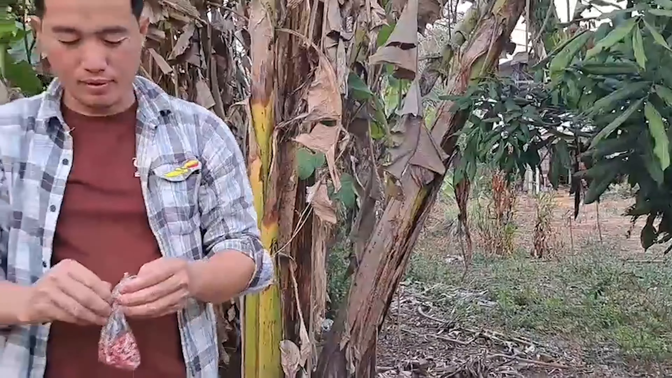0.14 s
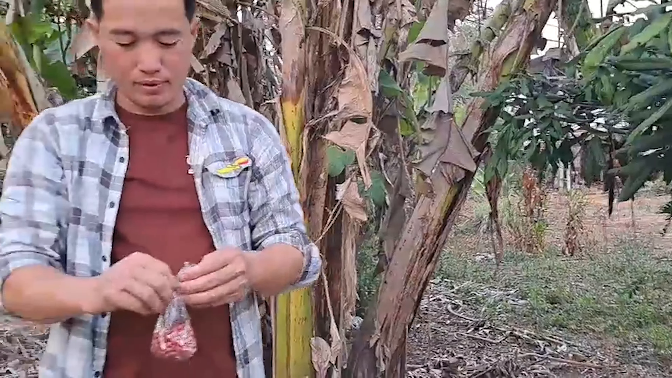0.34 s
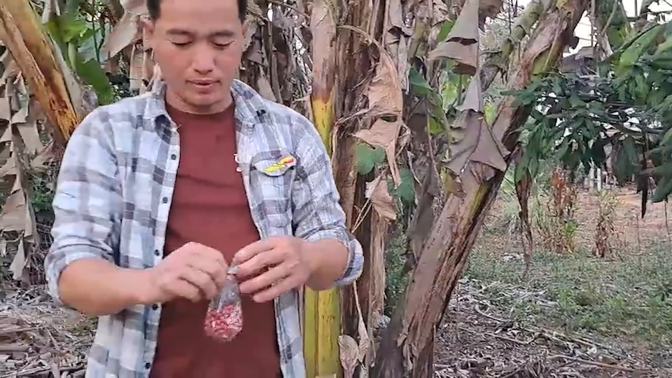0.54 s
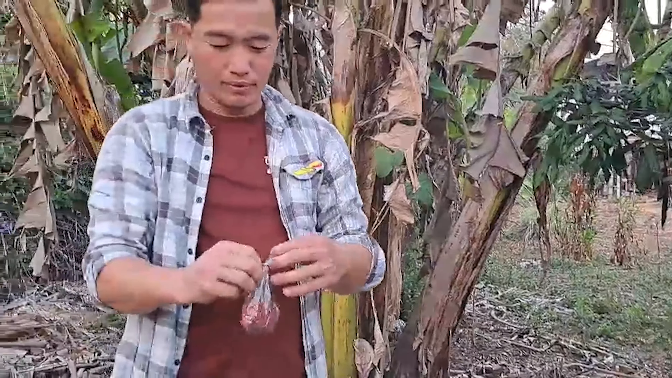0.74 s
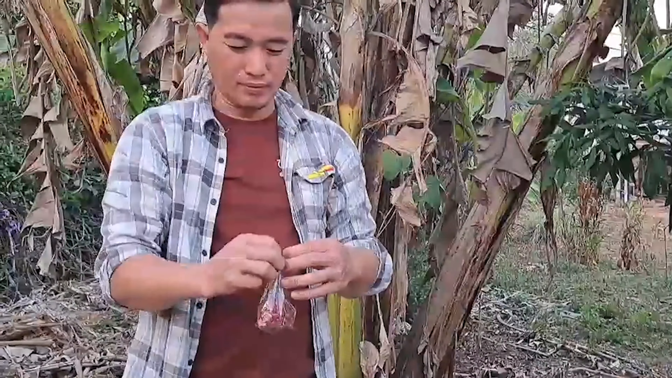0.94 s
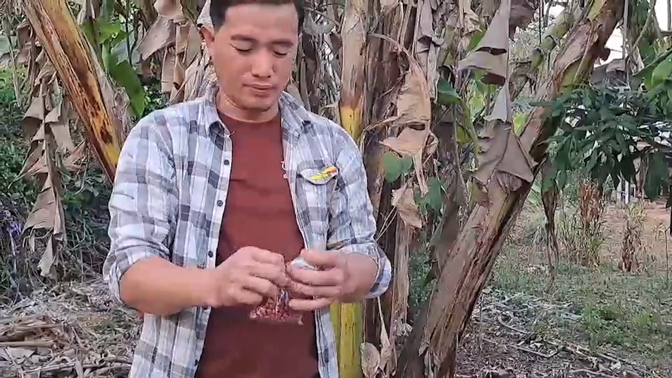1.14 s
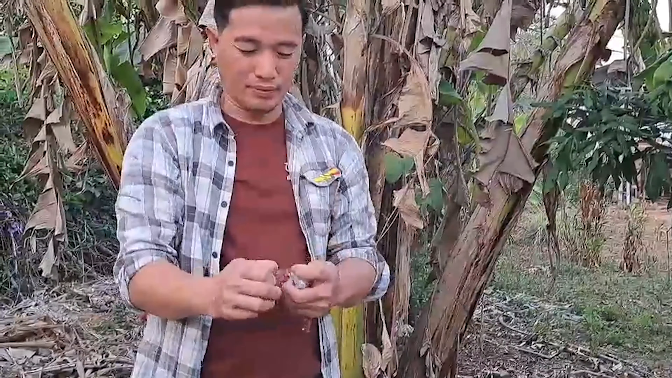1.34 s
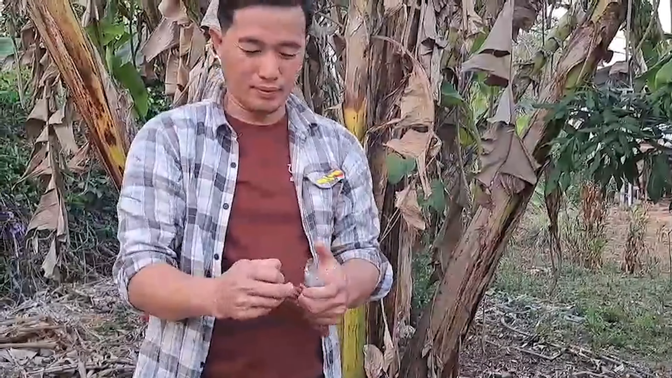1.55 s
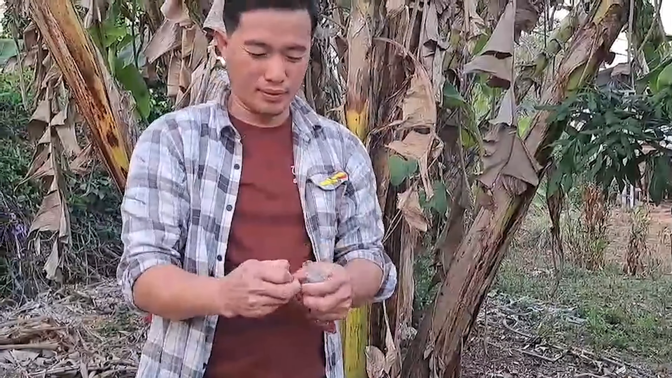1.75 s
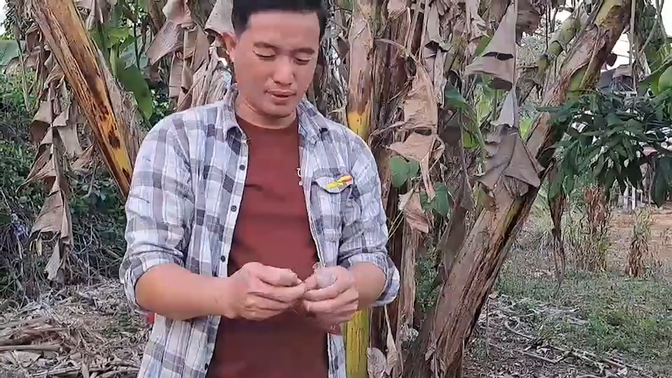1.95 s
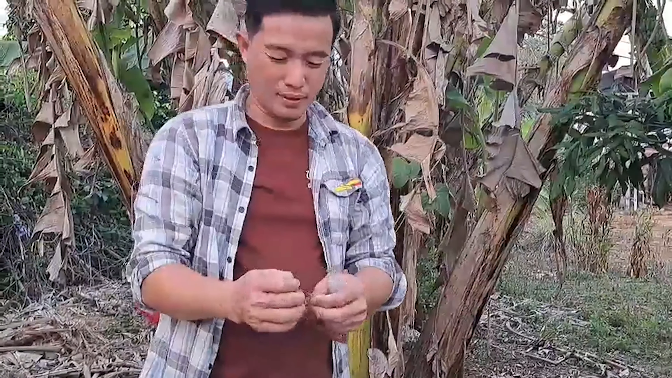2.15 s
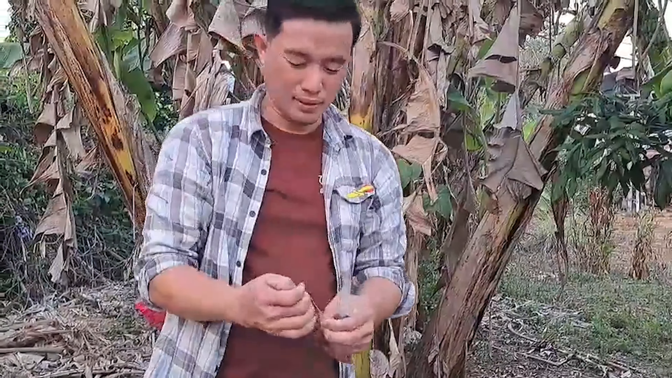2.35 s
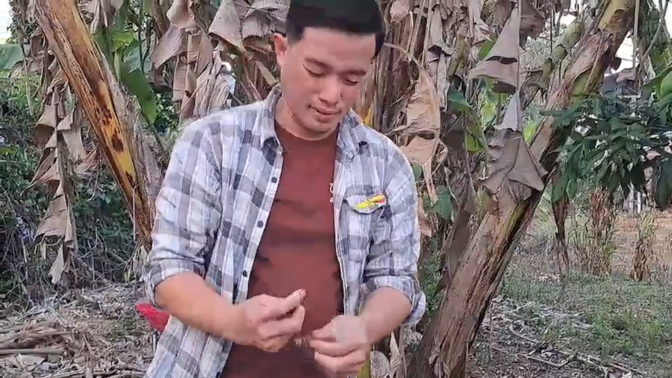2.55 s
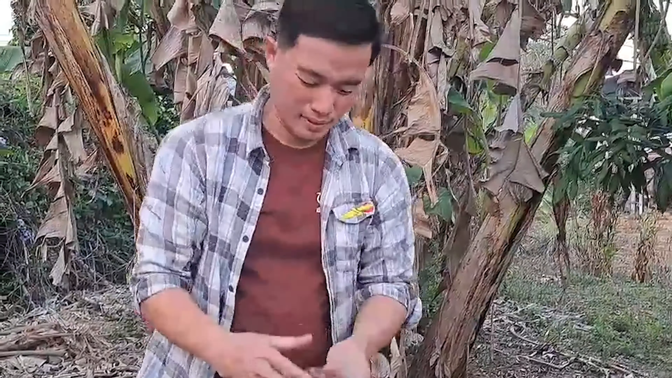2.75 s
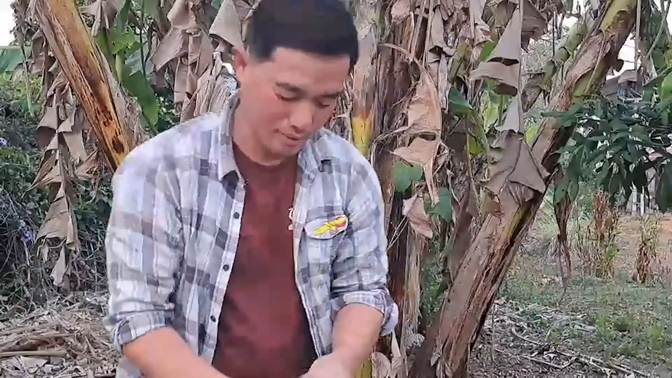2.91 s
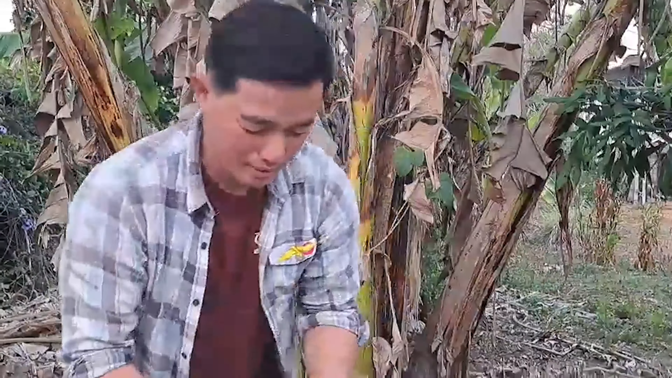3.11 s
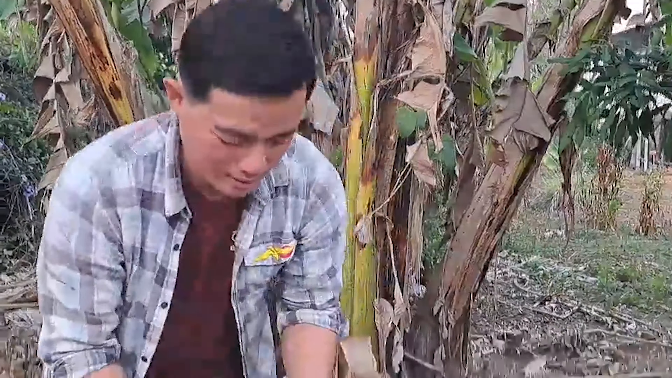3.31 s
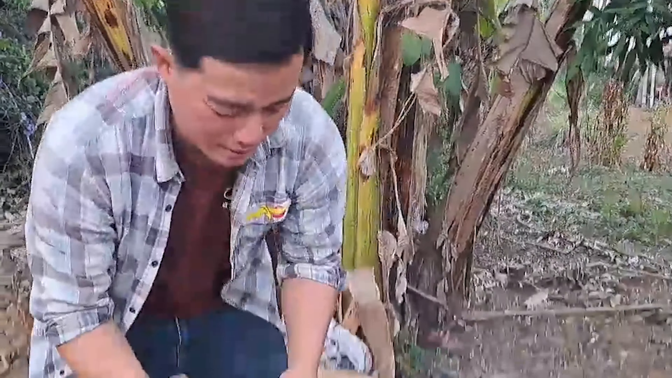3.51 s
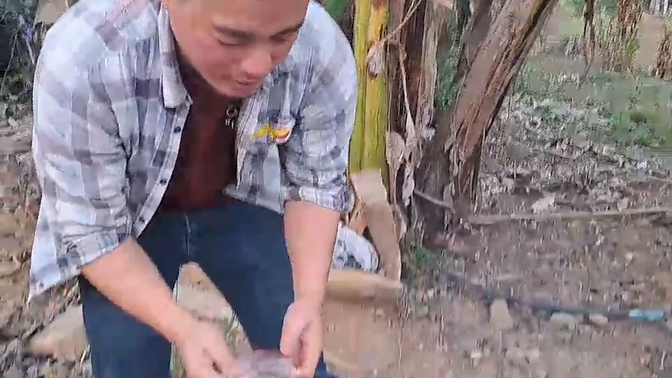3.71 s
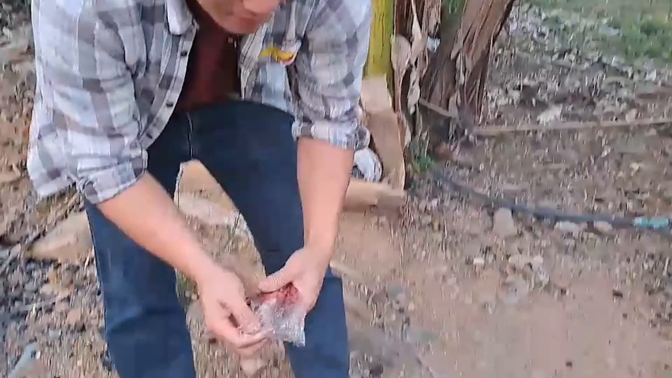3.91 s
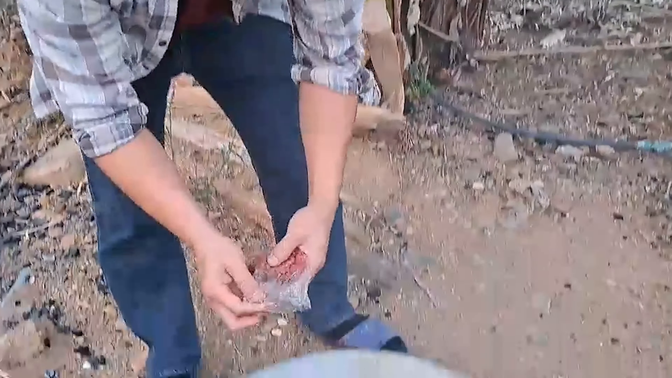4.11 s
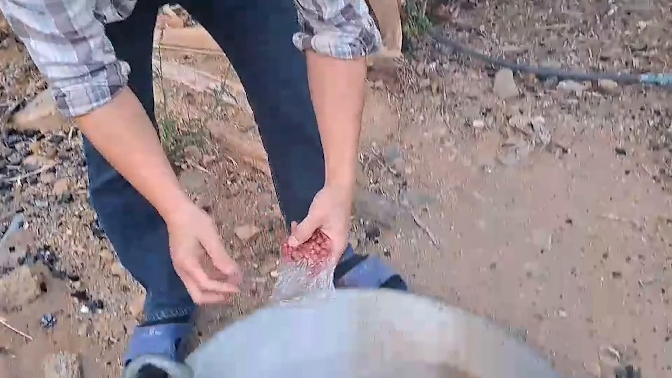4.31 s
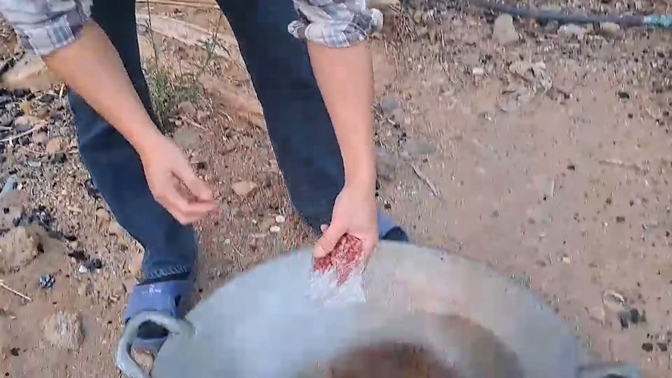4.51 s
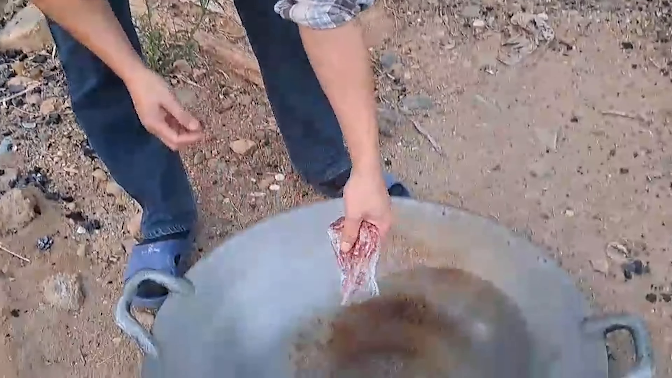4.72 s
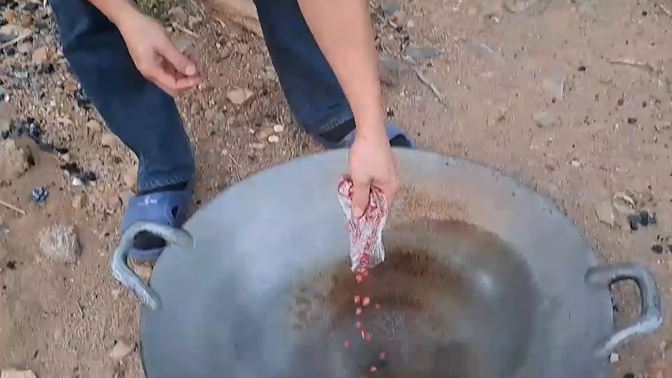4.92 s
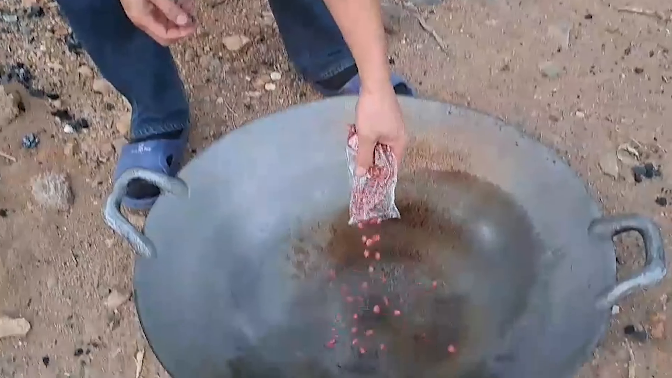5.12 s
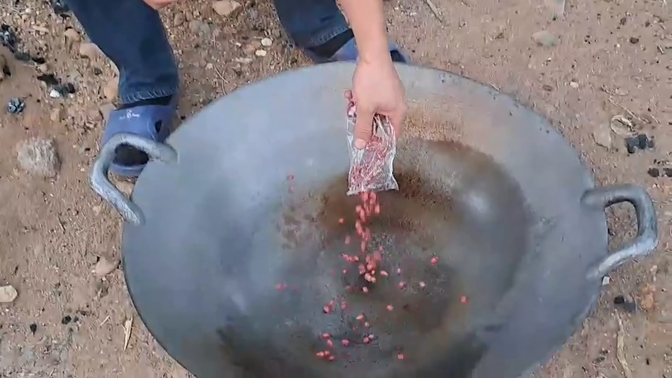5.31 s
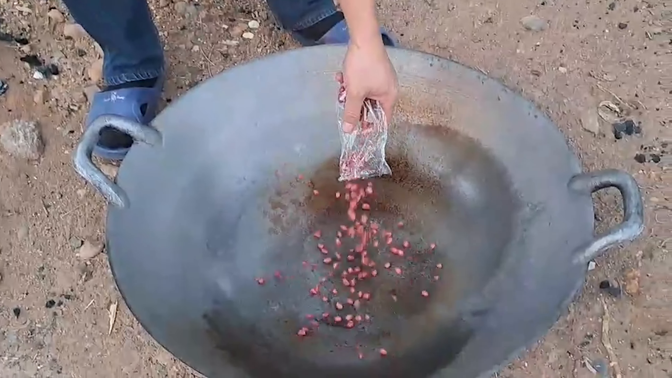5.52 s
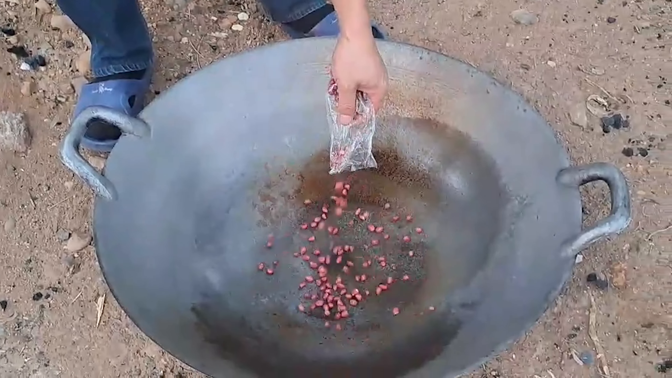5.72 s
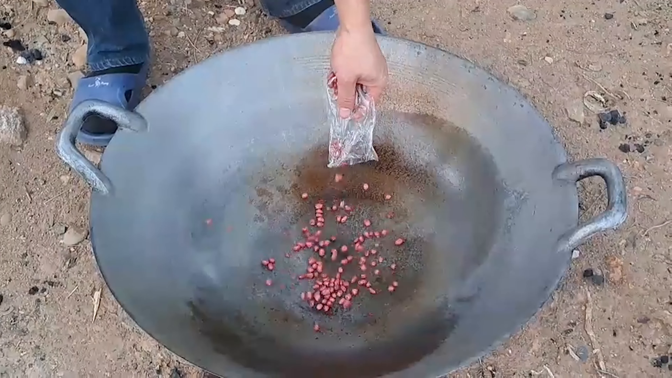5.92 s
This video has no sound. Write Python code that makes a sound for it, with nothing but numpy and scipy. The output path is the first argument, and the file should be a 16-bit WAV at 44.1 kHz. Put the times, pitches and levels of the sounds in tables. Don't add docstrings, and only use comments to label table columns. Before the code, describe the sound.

Outdoors, a thin plastic bag crinkles and pops in someone's hands, then peanuts pour with a dense metallic clatter into a big empty wok.

```python
import sys
import numpy as np
from scipy import signal
from scipy.fft import rfft, irfft
from scipy.io import wavfile

SR = 44100
rng = np.random.default_rng(int(sys.argv[2]) if len(sys.argv) > 2 else 0)


def gain_from_db(level_db):
    decades = np.asarray(level_db, float) / 20
    return 10 ** decades


def to_wav(s):
    ch = np.atleast_2d(s).T
    pcm = np.round(np.clip(ch, -1, 1) * 32767)
    wavfile.write(sys.argv[1], SR, pcm.astype(np.int16))


N = 262766

# frequency in Hz, likeness from 0 to 1.
LIKENESS = [(60, 0.97), (130, 0.93), (290, 0.74), (640, .4), (1400, 0.033), (3000, 0.25), (15000, 0.017)]
# frequency in Hz, level in dB per Hz.
AIR_TONE = [(1470, -16), (2500, -24), (4100, -43), (6980, 12), (9350, 8), (13600, -7), (15000, -24)]
# time in seconds, engine drone in dB, rumble in dB, tyre hiss in dB (from about 3
# s this last column carries the dull body of the handling).
ROAD_LEVELS = [(0.0, -44.5, -46.5, -49), (0.7, -43.5, -47, -53.5), (0.75, -38, -47, -57),
               (0.8, -40.5, -48, -54), (1.13, -48.5, -46.5, -54.5), (1.36, -39.5, -46, -57),
               (1.79, -54, -49.5, -62), (2.06, -47.5, -49.5, -66.5), (2.44, -53, -50, -68),
               (2.5, -42.5, -50.5, -65), (2.59, -53, -51, -66.0), (2.71, -52, -46.5, -63.5),
               (2.79, -54, -48, -62.5), (2.99, -53, -42, -53.5), (3.04, -52, -45, -57),
               (3.09, -54, -43, -53), (3.2, -49, -41.5, -55), (3.25, -48, -47, -55), (3.47, -63, -43, -53),
               (3.57, -41, -42, -52), (3.87, -44, -44, -53.5), (4.3, -41.5, -45, -57),
               (4.51, -41, -47, -56), (4.56, -35.5, -46, -55), (4.73, -38, -44.5, -52),
               (5.19, -37, -44.5, -53), (5.96, -36, -44, -77)]
# frequency in Hz, width in Hz, level in dB.
ENGINE_ORDERS = [(64.8, 4.7, -3), (97, 8.9, -14), (129.1, 17, 3), (188, 37, -8), (241.8, 30, -9)]
# frequency in Hz, level in dB per Hz.
RUMBLE_TONE = [(15, -46), (25, -38), (48, 5), (71, -1), (92, -10.5), (134, -1.5), (158, -6), (475, -16.5),
               (629, -13), (866, -17.5), (3000, -55), (3900, -80), (6600, -120)]
# frequency in Hz, level in dB per Hz.
TYRE_TONE = [(600, -21), (1100, 3), (2000, 2), (2650, -4), (3100, -11), (4800, -13.5), (6000, -22.5),
             (12000, -43)]
# time in seconds, rustle above 4 kHz in dB, body around 2 kHz in dB over it.
BAG_LEVELS = [(0.0, -65.5, 2), (0.11, -78, -1), (0.46, -69.5, -3.0), (0.48, -61, 1), (0.71, -65, -3.0),
              (0.72, -58, -3.0), (0.73, -63.5, 6.5), (0.84, -78, 13), (0.89, -61, 1), (1.02, -75, -7),
              (1.04, -56, -5), (1.06, -59, 3), (1.15, -52, -4), (1.34, -56.5, -0.5), (1.41, -47, 2),
              (1.45, -56.5, 0), (1.7, -67.5, 2), (1.73, -61, -6), (1.87, -72, -3.0), (1.88, -62, -3.0),
              (1.95, -72, 0), (2.17, -100, -5), (2.19, -73, -3.0), (2.57, -91, -12), (2.7, -67, -10),
              (2.8, -82, -5), (2.82, -57, -9), (2.85, -67, -7), (2.92, -45, -3.0), (2.96, -42, -6.5),
              (3.03, -55, -1), (3.11, -44.5, -3.5), (3.22, -41, -4.5), (3.28, -55.5, -13), (3.34, -43, -2),
              (3.38, -54, -8), (3.54, -43, -4.5), (3.81, -43, -1), (3.83, -54, 0), (3.85, -47, -0.5),
              (4.06, -54.5, 0), (4.07, -48.5, -5), (4.1, -51, 3.5), (4.18, -45.5, 0.5), (4.29, -51.5, -2),
              (4.32, -42.5, -4), (4.35, -53.5, 2), (4.4, -53.5, 0), (4.42, -50, -3.0), (4.43, -53, 2),
              (4.47, -57.5, 2.5), (4.51, -50, -0.5), (4.53, -60, 1), (4.58, -45.5, -2), (4.65, -45.5, -2),
              (4.66, -35.5, -3.0), (4.68, -47.5, 3), (4.69, -41, -3.5), (4.76, -49.5, -2), (4.8, -46.5, 3),
              (4.9, -49.5, -3.0), (4.96, -65, -3.0), (4.97, -55, -3.0)]
# frequency in Hz, level in dB per Hz.
FILM_TONE = [(2300, -20), (3200, -6.5), (5000, 1.5), (7200, 1), (9200, -4), (12500, -2.5), (14200, -1.5),
             (15500, -32)]
# frequency in Hz, level in dB per Hz.
BODY_TONE = [(400, -30), (900, -3.5), (1500, -3), (2500, -3.5), (4000, -8.5), (6000, -18), (12000, -55)]
# start in seconds, peak in dB, body in dB over it, brightness in dB per band.
CREASES = [(0.268, -44, -4, -5), (0.3212, -43.5, 0.1, 0.2), (0.4092, -48, 15, -2), (0.4429, -42, 2, 0.2),
           (0.4775, -40, 6, 4.2), (0.4963, -41, -3, 2), (0.5274, -37.5, 5, 0.2), (0.5781, -42, 7, -2),
           (0.613, -36, -8, -0.5), (0.7175, -36.5, -8, -5), (0.856, -58, 0.1, -10.5),
           (0.8879, -49, 0.1, -9), (0.9418, -56, -3, 0.2), (0.9755, -44, 5, -8.5), (1.0353, -28, -12, 1.5),
           (1.1099, -29.5, -5, -4), (1.1473, -32, -0.5, -1), (1.1852, -38, -4, 9.5), (1.2136, -40, -4, 0.2),
           (1.249, -30.5, -7, -1.5), (1.3019, -33.5, 1, -2), (1.3299, -40, 0.1, -3), (1.363, -31, 1.5, -5),
           (1.4002, -29.5, 11.5, -6.5), (1.482, -39.5, 0.1, -7), (1.6092, -40, 0.1, -4),
           (1.6267, -37, -12, -2), (1.6836, -47, -2, -2), (1.712, -46, 0.1, 0.2), (1.732, -38, -2, 0.2),
           (1.7644, -41, -4, -2), (1.7858, -41, -7, 1), (1.8043, -47, 3, 0.2), (1.8497, -47, 0.1, 0.2),
           (1.8756, -42.5, 12.8, 8.5), (2.189, -48.5, 0.1, 4), (2.236, -51, -5, 4), (2.3695, -55, 0.1, 3),
           (2.4973, -44, -14, 0.2), (2.6128, -45.5, -10, -1), (2.681, -42, -8, -1), (2.6983, -44, -9, -1),
           (2.7397, -48, -4, 0.2), (2.7661, -62, 0.1, 0.2), (2.8115, -49, -2, -2), (2.8235, -45, 2, 0.2),
           (2.8664, -50, 0.1, 0.2), (2.8828, -35, -4, -1), (2.9092, -34.5, 3, 0.2), (2.952, -28, 1.5, 2.5),
           (2.9981, -37, -13, 5), (3.049, -35, 3, 0.2), (3.2159, -30, 0.1, 6), (3.25, -30.5, -3, 1),
           (3.3282, -33.5, -5, 0.2), (3.4241, -47, 0.1, 2), (3.4441, -41, 0.1, 4), (3.676, -44, -3, 0.2),
           (3.8452, -32, -8, -1), (3.9826, -35, 0.1, -4), (4.066, -27, -7, -2), (4.1262, -33, 2, -6),
           (4.1655, -29.5, 7, -7), (4.2457, -29, -9, 0.2), (4.284, -31, 1, -2), (4.3139, -24, -13, -5),
           (4.3615, -41, -3, -9), (4.3774, -47, 0.1, 0.2), (4.4132, -25.5, -9, -3), (4.4578, -43, 0.1, 0.2),
           (4.4802, -46, 2, -1), (4.505, -26, -10, -1), (4.5441, -41, -3, -2), (4.5657, -33.5, 9, -7),
           (4.588, -23.5, -8, -4), (4.6134, -28, -2, -7), (4.6388, -26, 3, -7), (4.66, -16, -7, -2),
           (4.688, -23.5, -5, -6.5), (4.7197, -34, 12.5, -2), (4.7874, -31, -9, -2), (4.803, -25, -2, -4),
           (4.8609, -24, -12, -1.5), (4.9054, -25, 0.1, -3)]
# start in seconds, end in seconds, start pitch in Hz, end pitch in Hz, level in dB.
BIRD_NOTES = [
    (.62, .78, 4250, 3750, -69),
    (.9, 1.023, 3750, 4150, -66),
    (.7, 1.3, 2890, 2830, -67.5),
    (2.175, 2.265, 5930, 5800, -75),
    (2.24, 2.34, 6500, 7100, -90),
    (4.746, 4.824, 545, 523, -49),
    (4.782, 4.868, 568, 588, -49),
]
# start in seconds, peak in dB, brightness in dB per octave.
NUT_HITS = [(4.99, -13, -1), (5.0121, -8, -1.2), (5.0453, -13, 6.7), (5.048, -6, -3.5), (5.0628, -10.5, -1),
            (5.0796, -11.5, 3.2), (5.0913, -7.5, -2), (5.1319, -7, 2.5), (5.1546, -7.5, 0.5),
            (5.1986, -10, 3.2), (5.2065, -11.5, 0.5), (5.2382, -16.5, 2), (5.2574, -15.5, 0.1),
            (5.2694, -14, -4), (5.2836, -9, 1), (5.2994, -6, 0.3), (5.3391, -22, 5.5), (5.3477, -7, -1.5),
            (5.3715, -8.5, 1.1), (5.3848, -8, -0.2), (5.41, -9, -2.3), (5.4362, -12.5, 2),
            (5.4514, -12, 0.5), (5.4617, -12, 0.5), (5.4761, -9.5, -3), (5.4906, -11.5, -1.5),
            (5.5067, -9, 1.8), (5.5218, -9.5, -6.3), (5.5392, -11.5, -2), (5.55, -11.5, -0.5),
            (5.5754, -18, 4.3), (5.5838, -17.5, -11), (5.6109, -15, 2), (5.6221, -10.5, -1.7),
            (5.6275, -10, -1.5), (5.6454, -18, -4), (5.663, -9.5, 1.3), (5.6837, -11.5, -2),
            (5.7056, -12, -2), (5.7222, -12.5, -3.5), (5.7369, -21, -8.5), (5.771, -13.5, 0.5),
            (5.8091, -9.5, -0.5), (5.8255, -15, 2.5), (5.8505, -19, -1), (5.8744, -23, -7),
            (5.8882, -21, -5), (5.8967, -12.5, -3), (5.9319, -13, -4.2)]
# time in seconds, level in dB.
REBOUNDS = [
    (5.03, -47),
    (5.05, -39),
    (5.168, -24),
    (5.556, -16),
    (5.848, -16),
    (5.958, -27.5),
]
STRONG_HZ = [1263, 1393, 1409, 1538, 1782, 1869, 2058, 2112, 2178, 2241, 2432, 2632, 2935, 3260, 3611, 3765,
             3908, 4113, 4390, 4735, 5090, 6350]
# strength in dB, ring time t60 in seconds.
STRONG_RING = [(-3, 0.25), (-9.5, 0.19), (-12, 0.12), (-1.5, 0.17), (-19, 0.24), (-13.5, 0.16), (-19, 0.12),
               (-12, 0.22), (-16, 0.24), (-7.5, 0.14), (-15, 0.34), (-22, 0.22), (-10, 0.17), (-18, .15),
               (-21, 0.17), (-19, 0.36), (-18.5, 0.41), (-26, 0.21), (-15, .12), (-13, 0.13), (-9.5, 0.08),
               (-17, 0.079)]
# frequency in Hz, level in dB.
CROWD_LEVEL = [(1150, -14.5), (1300, -10), (2200, -8.5), (3500, -8.5), (5000, -5), (6500, -11), (7800, -16),
               (8500, -19.5)]
# frequency in Hz, t60 in seconds.
CROWD_T60 = [(1200, 0.12), (2600, 0.26), (5000, 0.088), (9000, 0.081)]
# frequency in Hz, angle in radians.
MODE_SPREAD = [(1200, 0.17), (1700, 0.49), (2400, 0.85), (4000, 1.26), (9000, 1.27)]


def rms_one(x):
    return x / np.sqrt(np.mean(x ** 2) + 1e-20)


def in_time(rows):
    seconds, *columns = np.transpose(rows)
    return [np.interp(np.arange(N) / SR, seconds, column) for column in columns]


def at_hz(points, hz):
    table_hz, values = np.array(points).T
    return np.interp(np.log(hz), np.log(table_hz), values)


def drift(rate_hz):
    r = np.exp(-80 * np.pi * rate_hz / SR)
    slow = signal.lfilter([1], [1, -2 * r, r * r], rng.standard_normal(N // 40 + 2002))
    slow = slow[2000:]
    return np.interp(np.arange(N) / 40, np.arange(len(slow)), rms_one(slow))


def ring(clicks, hz, t60):
    r, w = gain_from_db(-60 / (t60 * SR)), 2 * np.pi * hz / SR
    return signal.lfilter([0, np.sin(w)], [1, -2 * r * np.cos(w), r * r], clicks + 1e-18)


def decay(clicks, seconds):
    return signal.lfilter([1], [1, -np.exp(-1 / (seconds * SR))], clicks)


def filtered(x, order, hz, kind):
    return signal.sosfilt(signal.butter(order, hz, kind, fs=SR, output="sos"), x)


def coloured(pair, tone):
    hz = np.maximum(np.arange(N // 2 + 1) * SR / N, 1)
    alike = np.clip(at_hz(LIKENESS, hz), -1, 1)
    inside = (hz > tone[0][0]) * (hz < tone[-1][0])
    mid, side = rfft(pair) * gain_from_db(at_hz(tone, hz)) * inside
    mid, side = np.sqrt(1 + alike) * mid, np.sqrt(1 - alike) * side
    return rms_one(irfft(np.array([mid + side, mid - side]), N))


def air():
    return gain_from_db(-85) * coloured(rng.standard_normal((2, N)), AIR_TONE)


def road():
    drone_db, rumble_db, tyre_db = in_time(ROAD_LEVELS)
    white = rng.standard_normal(N + SR)
    orders = sum(gain_from_db(db) * rms_one(ring(white, hz, 2.66 / width)[SR:]) for hz, width, db in ENGINE_ORDERS)
    rumble = coloured(rng.standard_normal((2, N)), RUMBLE_TONE) * gain_from_db(1.08 * drift(5.2))
    tyres = coloured(rng.standard_normal((2, N)), TYRE_TONE)
    leaving_db = -48.5 - 10.4 * np.arange(N) / SR
    leaving = gain_from_db(leaving_db) * rms_one(ring(white, 208, 0.055)[SR:])
    drone = gain_from_db(drone_db - 3.5) * rms_one(orders)
    return leaving + drone + gain_from_db(rumble_db) * rumble + gain_from_db(tyre_db) * tyres


def bag(grains_per_s, spread_db, smooth):
    film_db, body_db = in_time(BAG_LEVELS)
    clump = drift(25)
    out = np.zeros((2, N))
    layers = [(FILM_TONE, film_db, "low"), (FILM_TONE, film_db, "high"), (BODY_TONE, film_db + body_db, None)]
    for tone, level_db, side in layers:
        born = rng.random(N) < grains_per_s * gain_from_db(3.0 * clump) / SR
        sizes = born * gain_from_db(spread_db * np.minimum(rng.exponential(1, N), 4))
        crackle = rms_one(decay(sizes, 0.00094))
        friction = gain_from_db(1.5 * clump + 1.7 * drift(9.1))
        gate = smooth * friction + (1 - smooth) * crackle
        sound = coloured(gate * rng.standard_normal((2, N)), tone)
        if side:
            sound = filtered(sound, 2, 7500, side)
        out += gain_from_db(level_db) * sound
    return out * gain_from_db([[-.6], [.6]])


def snaps(film_s, body_s, colour_db):
    start_s, peak_db, body_db, bright_db = np.array(CREASES).T
    at = np.round(start_s * SR).astype(int)
    colour = colour_db * rng.standard_normal((len(at), 3))
    side_db = -1.2 + 1.3 * rng.standard_normal(len(at))
    film = coloured(rng.standard_normal((2, N)), FILM_TONE)
    layers = []
    for k, edges in enumerate(([2500, 5500], [5500, 9000], [9000, 16000])):
        band_db = peak_db - 3 + colour[:, k] + bright_db * (k - 1)
        layers.append((filtered(film, 2, edges, "band"), band_db, film_s))
    layers.append((coloured(rng.standard_normal((2, N)), BODY_TONE), peak_db + body_db - 14, body_s))
    rise = np.exp(-1 / (0.00034 * SR))
    out = np.zeros((2, N))
    for noise, db, decay_s in layers:
        clicks = np.zeros((2, N))
        clicks[:, at] = gain_from_db(db + np.outer([.5, -.5], side_db))
        clicks += 1e-18
        shape = decay(clicks, decay_s) + 0.05 * decay(clicks, 18.0 * decay_s)
        out += signal.lfilter([1 - rise], [1, -rise], shape) * noise
    return out


def birds():
    t, out = np.arange(N) / SR, np.zeros(N)
    for start_s, end_s, start_hz, end_hz, db in BIRD_NOTES:
        share = np.clip((t - start_s) / (end_s - start_s), 0, 1)
        hz = (start_hz + (end_hz - start_hz) * share) * (1 + 0.0039 * drift(23.6))
        swell = gain_from_db(db + 2.3 * drift(8.8)) * np.sin(np.pi * share) ** 0.23
        out += swell * np.sin(2 * np.pi * np.cumsum(hz) / SR)
    return out * gain_from_db([[.7], [-.7]])


def shell_modes(crowd_db):
    modes = [(hz, *mode) for hz, mode in zip(STRONG_HZ, STRONG_RING)]
    crowd = np.linspace(1190, 8450, num=340) + 13.0 * rng.standard_normal(size=340)
    for k, hz in enumerate(crowd):
        share = [1, .28][k % 2]
        modes.append((hz, at_hz(CROWD_LEVEL, hz) + crowd_db, at_hz(CROWD_T60, hz) * share))
    return modes


def wok(crowd_db, travel_s, thud_db, tick_db, bounces_per_s):
    start = int(4.9 * SR)
    length = N - start
    nut_s, nut_db, nut_bright = np.array(NUT_HITS).T
    at = np.round(nut_s * SR).astype(int) - start
    small = np.flatnonzero(rng.random(length) < bounces_per_s / SR)
    small = small[small > at[1]]
    small_db = in_time(REBOUNDS)[0][start + small] - 1.5 + 1.7 * rng.standard_normal(len(small))
    at, hit_db = np.r_[at, small], np.r_[nut_db, small_db]
    bright = np.r_[nut_bright, np.full(len(small), -1.2)]

    out = np.zeros((2, length))
    for hz, level_db, t60 in shell_modes(crowd_db):
        clicks, (place, turn) = np.zeros(length), rng.random(2)
        late = int(place * travel_s * np.sqrt(1500 / hz) * SR)
        strength_db = hit_db + level_db - 10.5 + bright * np.log2(hz / 2500)
        strength_db = strength_db + 1.86 * rng.standard_normal(len(at))
        clicks[np.minimum(at + late, length - 1)] = gain_from_db(strength_db) * rng.choice([-1, 1], len(at))
        aim = np.pi / 4 + 1.22 * at_hz(MODE_SPREAD, hz) * (2 * turn - 1)
        out += np.outer([np.cos(aim), np.sin(aim)], ring(clicks, hz, max(t60, .01)))
    out = filtered(out, 6, 1080, "high")

    clicks = np.zeros(length)
    clicks[at] = gain_from_db(2.02 * hit_db + 11.5)
    push = filtered(clicks, 2, 550, "low") * SR / 1100
    out += gain_from_db(thud_db) * (ring(push, 310, 0.028) + 0.66 * ring(push, 416, 0.027))

    sharp = np.zeros(length)
    sharp[at] = gain_from_db(hit_db + 2.0 * bright)
    ticks = rng.standard_normal((2, length)) * decay(sharp, .011)
    out += gain_from_db(tick_db) * filtered(ticks, 5, [8900, 13500], "band")
    return np.pad(out * gain_from_db([[-1.1], [1.1]]), ((0, 0), (start, 0)))


def scene():
    garden = air() + road() + birds()
    hands = bag(grains_per_s=800, spread_db=3.8, smooth=.45)
    hands = hands + snaps(film_s=0.0011, body_s=0.0045, colour_db=1)
    pour = wok(crowd_db=-8, travel_s=.004, thud_db=-61, tick_db=-26.5, bounces_per_s=120)
    return garden + hands + pour


def low_pass(x):
    return signal.sosfilt(signal.butter(12, 15570, fs=SR, output="sos"), x)


def record(dry):
    mix = filtered(dry, 3, 40, "high")
    mix = signal.sosfilt(signal.cheby2(12, 30, 14550, fs=SR, output="sos"), mix)
    return low_pass(mix)


dry = scene()
out = record(dry)
to_wav(out)
```